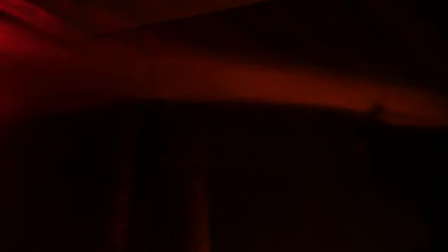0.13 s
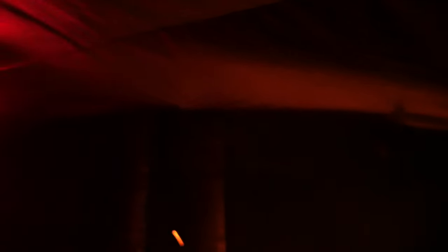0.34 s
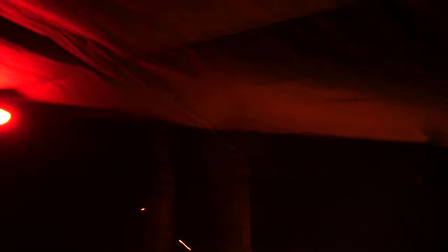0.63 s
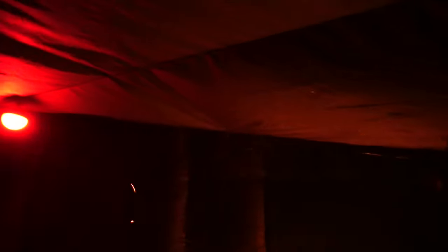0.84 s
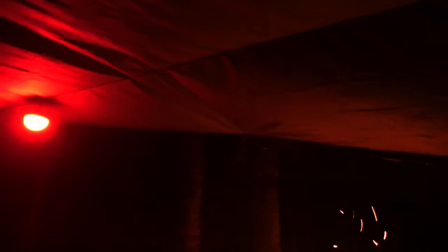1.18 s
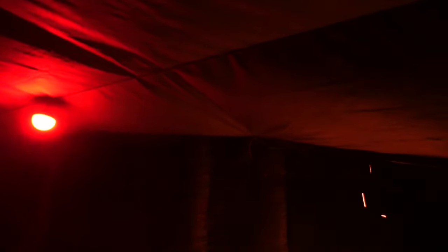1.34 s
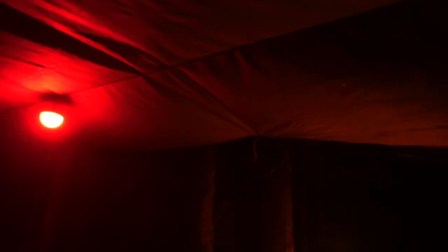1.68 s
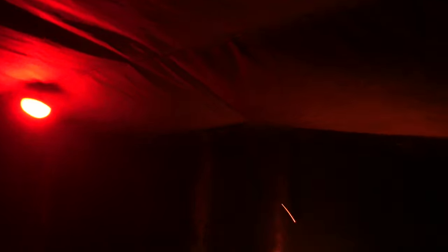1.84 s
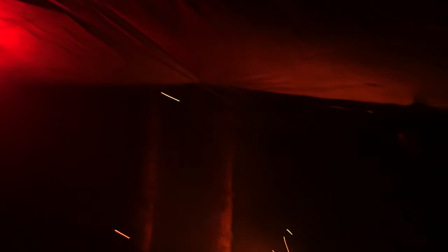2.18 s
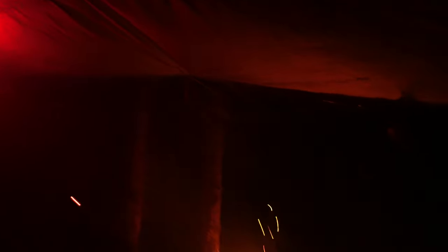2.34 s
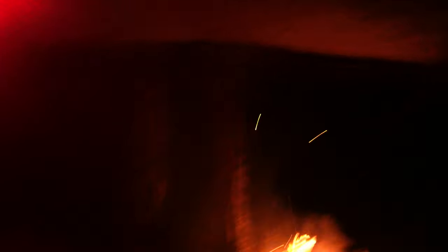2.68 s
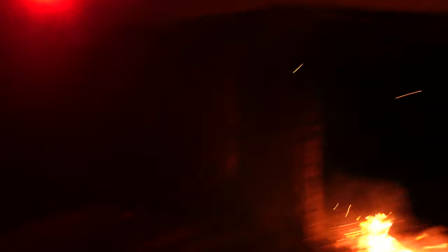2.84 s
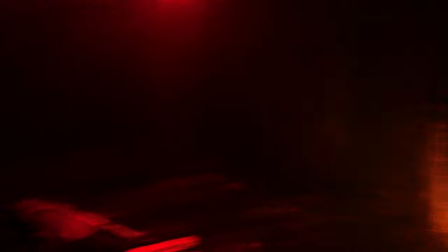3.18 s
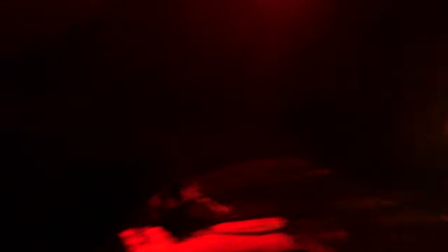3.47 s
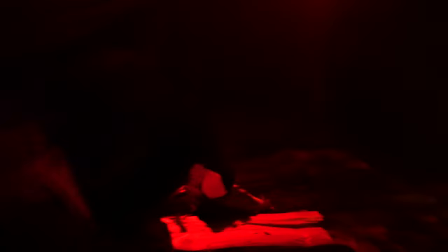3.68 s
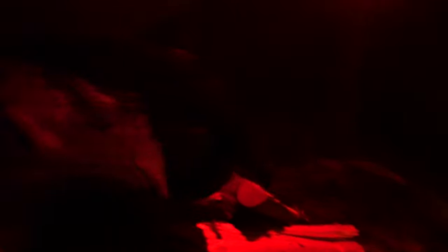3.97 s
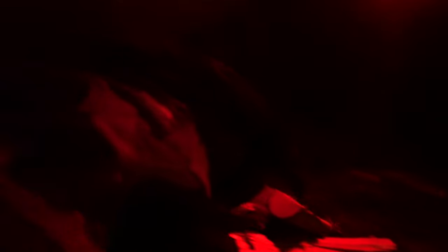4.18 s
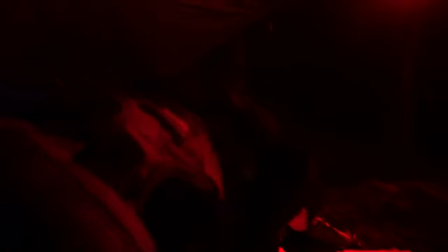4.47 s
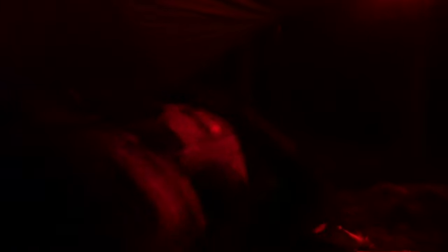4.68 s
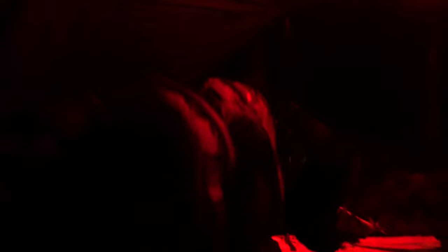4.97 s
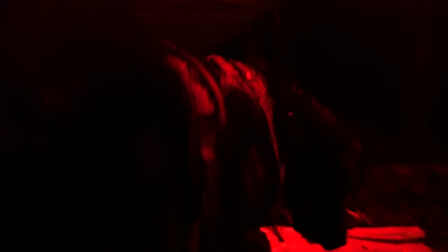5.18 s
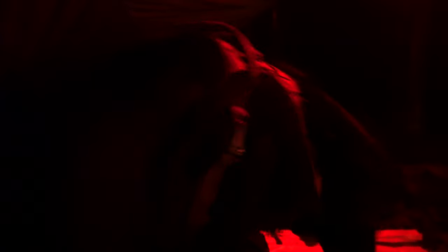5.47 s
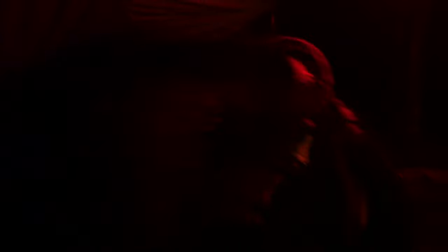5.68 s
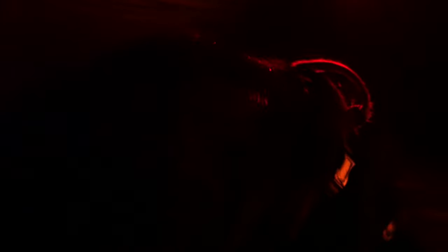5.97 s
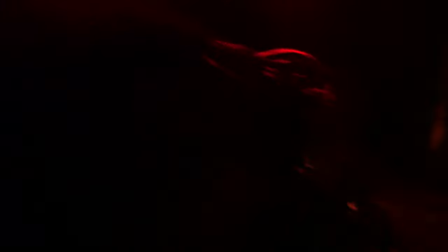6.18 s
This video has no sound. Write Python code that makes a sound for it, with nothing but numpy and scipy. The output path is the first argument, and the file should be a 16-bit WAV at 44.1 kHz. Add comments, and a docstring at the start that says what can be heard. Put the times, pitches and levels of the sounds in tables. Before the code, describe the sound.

Rain falls on a tarp stretched low over a small, close microphone in a night forest. Throughout, fine drops patter densely and bright tiny splashes sprinkle over a soft, flickering hiss of rain on leaves. Larger drops punch the sheet irregularly, short dull thwacks with a close ground echo and wet shiver; strong ones land near 0.6, 1.4, 2.3, 3.6, 4.0, 4.5 and 5.6 seconds. Big drops grow busier from about 3 to 5 seconds, while the hiss swells from 2.6. A campfire flutters very low, with rumbling surges around 2.7, 3.2 to 3.5, 4.9 and 6.2. Dull pops sound at 1.7, 2.6, 3.7, 4.1 and 5.5. Sharp high ticks on gear come at 4.9, 5.3 and 5.6; cloth brushes faintly at 5.9, and a small hollow ping rings at 6.3 as rain continues.

```python
"""Big raindrops punch a tarp stretched low over a microphone: each is a push on a springy sheet,
with a duller ground echo, a noisy shiver and a bright burst. Smaller drops patter all over it.
Splashes are a tick with a pitched burst of noise; drops on camp gear leave dying tones. Rain hisses in
the forest as flickering noise. A camp fire throbs on a wandering sine over a noisy roar, dull pops
push outward, and cloth brushes once as grainy treble noise."""
import sys
import numpy as np
from scipy import signal
from scipy.fft import rfft, irfft
from scipy.io import wavfile
from scipy.ndimage import uniform_filter1d

SR = 44100
rng = np.random.default_rng(int(sys.argv[2]) if len(sys.argv) > 2 else 0)


def unload_audio(sound):
    """Save the sound as a 16-bit wav file, at the path given as the first command line argument."""
    columns = np.transpose(np.atleast_2d(sound))
    # keep every value between -1 and 1, then stretch to whole-number steps
    steps = np.round(np.clip(columns, -1, 1) * 32767)
    wavfile.write(sys.argv[1], SR, steps.astype(np.int16))


N = 279153  # length in samples

# All levels are set ahead of the microphone's colour.
# Big drops on the sheet. Each row: start in seconds, punch level in dB, contact time in ms,
# ground echo delay in ms.
BIG_DROPS = [(0.131, -24, 0.086, 2.0), (0.1456, -26, 0.17, 3.2), (0.1569, -24, 0.17, 4.2),
             (0.286, -27, 0.13, 3.1), (0.2922, -24.5, 0.24, 2.6), (0.3743, -29.5, 0.13, 0.91),
             (0.4502, -20, 0.24, 3.05), (0.5766, -15.5, 0.17, 3.1), (0.5852, -8.5, 0.2, 0.48),
             (0.6455, -23.5, 0.071, 2.5), (0.6798, -21, 0.053, 1.2), (0.6867, -17, 0.17, 2.8),
             (0.8723, -16.5, 0.21, 0.97), (0.8793, -23, 0.13, 3.8), (0.9123, -26.5, 0.18, 1.4),
             (0.9404, -27.5, 0.18, 3.4), (0.9516, -33, 0.19, 3.0), (0.9746, -27, 0.17, 3),
             (1.0063, -24.5, 0.083, 2.3), (1.0129, -23.5, 0.18, 2), (1.0585, -26, 0.15, 2.1),
             (1.0674, -26.5, 0.21, 3.1), (1.0868, -23.5, 0.17, 2.3), (1.1371, -26, 0.22, 2.3),
             (1.2218, -25.5, 0.19, 2.5), (1.35, -24, 0.12, 2), (1.3676, -9, 0.26, 3.4),
             (1.4241, -26, 0.09, 2.4), (1.4464, -19.5, 0.18, 3), (1.6048, -31, 0.14, 3.4),
             (1.6741, -23, 0.17, 2.5), (1.7488, -18.5, 0.33, 2.67), (1.7878, -19, 0.2, 2.9),
             (1.796, -14.5, 0.16, 2.2), (1.8483, -22, 0.24, 2.45), (1.895, -22.5, 0.065, 2.2),
             (1.989, -18, 0.14, 1.5), (2.2686, -12.5, 0.16, 2.83), (2.3425, -21, 0.11, 2.5),
             (2.352, -27.5, 0.19, 4.8), (2.411, -24, 0.16, 5.5), (2.4242, -19.5, 0.19, 3.6),
             (2.5303, -17.5, 0.2, 2.8), (2.5523, -17.5, 0.22, 2.44), (2.657, -25.5, 0.21, 2.8),
             (2.7146, -26, 0.22, 3.2), (2.877, -21.5, 0.2, 2.3), (2.8993, -18, 0.22, 4.1),
             (3.0149, -14, 0.094, 3.6), (3.067, -19.5, 0.28, 3.1), (3.0893, -21, 0.17, 1.2),
             (3.1038, -28.5, 0.56, 1.5), (3.1256, -23.5, 0.19, 1.3), (3.1589, -24, 0.13, 1.8),
             (3.2837, -36, 0.077, 3.3), (3.3123, -22.5, 0.16, 3.8), (3.377, -22, 0.21, 2.7),
             (3.432, -12.5, 0.27, 2.64), (3.4427, -21, 0.18, 1.9), (3.4969, -17, 0.28, 2.5),
             (3.511, -20.5, 0.14, 2.6), (3.5167, -19.5, 0.24, 3.3), (3.5756, -12, 0.14, 2.9),
             (3.598, -16, 0.21, 3.1), (3.6142, -27, 0.49, 1.6), (3.645, -9, 0.26, 2.74),
             (3.7386, -21, 0.087, 3), (3.8322, -18, 0.2, 3.04), (3.9407, -22.5, 0.23, 2.3),
             (3.9812, -15, 0.19, 2.6), (4.0234, -10, 0.28, 2.5), (4.0414, -23, 0.077, 2.3),
             (4.1911, -24, 0.14, 2.6), (4.1931, -26.5, 0.27, 2.3), (4.2, -18, 0.12, 1.8),
             (4.221, -26, 0.2, 3.3), (4.2372, -24.5, 0.25, 5), (4.2653, -19.5, 0.097, 2.6),
             (4.2794, -28, 0.46, 2), (4.4294, -19, 0.21, 2.5), (4.4856, -22, 0.21, 3.2),
             (4.534, -7, 0.16, 2.1), (4.5963, -24.5, 0.21, 1.9), (4.6154, -25, 0.2, 2.3),
             (4.629, -15, 0.3, 2.85), (4.6402, -22.5, 0.15, 1.9), (4.6711, -19.5, 0.69, 2.0),
             (4.722, -20.5, 0.13, 2.4), (4.736, -14, 0.22, 3.07), (4.771, -24.5, 0.11, 1.9),
             (4.8427, -21.5, 0.16, 2.2), (4.8643, -23, 0.31, 2.8), (4.9015, -20, 0.1, 1.4),
             (4.947, -25.5, 0.18, 3.2), (4.967, -19.5, 0.13, 1.6), (5.0124, -17.5, 0.074, 2.1),
             (5.0403, -22.5, 0.086, 2.5), (5.07, -15, 0.29, 2.14), (5.1507, -24, 0.11, 2.6),
             (5.257, -30, 0.16, 2.8), (5.2969, -24, 0.17, 2.4), (5.3371, -21.5, 0.27, 1.2),
             (5.3695, -16, 0.14, 2.1), (5.4038, -22, 0.2, 1.5), (5.4355, -14.5, 0.24, 2.55),
             (5.4625, -19.5, 0.16, 3.1), (5.577, -23.5, 0.3, 3.4), (5.584, -6.5, 0.17, 2.28),
             (5.7321, -22.5, 0.35, 2.2), (5.7632, -20.5, 0.19, 2.1), (5.7696, -24, 0.13, 2.6),
             (5.9524, -16.5, 0.061, 1.7), (6.1026, -28, 0.13, 2.6), (6.1275, -21.5, 0.1, 2.1),
             (6.1907, -17, 0.17, 2.2), (6.2102, -29, 0.23, 2.3), (6.2352, -29.5, 0.16, 1.7),
             (6.2681, -12.5, 0.22, 2.4), (6.2963, -34, 0.22, 1.4)]
# Ground echo of the big drops, stronger and weaker by turns.
# Each row: time in seconds, echo level in dB relative to the drop.
GROUND_ECHO = [(0.0, -10), (1.4, -15.5), (1.75, -6.5), (3.1, -17.5), (3.5, -10), (4.7, -7), (6.33, -12)]
# The brightest splashes. Each row: start in seconds, level in dB, pitch in Hz.
BRIGHT_SPLASHES = [(0.1984, -33.5, 5400), (0.872, -38, 3660), (1.071, -35, 6850), (1.3928, -34, 4650),
                   (1.4213, -34, 9000), (1.5521, -37.5, 3480), (1.8365, -30.5, 7000), (2.1898, -36.5, 3730),
                   (2.2135, -38, 3670), (2.374, -41, 4180), (2.3997, -34.5, 3500), (2.497, -38, 4070),
                   (2.7542, -37, 5080), (2.8, -37, 5330), (2.9973, -41, 5100), (3.015, -32, 3800),
                   (3.4784, -35, 6000), (3.559, -44, 6000), (3.612, -41, 8000), (3.6421, -33, 4400),
                   (4.0124, -33, 4900), (4.1907, -41, 4100), (4.373, -32, 5350), (5.1492, -30.5, 5100),
                   (5.2866, -37, 5200), (5.578, -29, 4790), (5.5831, -29, 7450), (5.9908, -32, 4600)]
# Drops on hollow or hard gear. Each row: start in seconds, level in dB, pitch in Hz,
# time to fall 60 dB in seconds.
GEAR_PINGS = [(1.553, -28.5, 390, 0.021), (1.689, -44, 130, 0.054), (4.87, -30.5, 5860, 0.02),
              (4.9225, -22.5, 5650, 0.02), (5.3345, -21.5, 5730, 0.019), (5.585, -29.5, 81.5, 0.065),
              (5.6151, -31.5, 5980, 0.012), (5.6763, -31, 5900, 0.0079), (6.272, -36.5, 355, 0.19),
              (6.272, -46, 4750, 0.2), (6.271, -46, 5350, 0.11)]
# Strength of the rain. Each row: time in seconds, swell of the hiss in dB, patter on the sheet in dB.
RAIN_LEVELS = [(0.0, -50, -43), (0.33, -63, -48.5), (1.51, -63.5, -48.5), (2.61, -51.5, -47),
               (3.12, -47.5, -46), (3.52, -53, -43.5), (3.97, -51, -51), (4.37, -48, -51.5),
               (4.85, -47.5, -46.5), (5.08, -55, -47.5), (5.99, -55, -49), (6.33, -55, -45.5)]
# Throb of the flames. Each row: time in seconds, level in dB.
FLAME_LEVELS = [(0.0, -43.5), (0.3, -29.5), (0.95, -42), (2.54, -36.5), (2.8, -33.5), (3.06, -39),
                (3.22, -24), (3.31, -36), (3.45, -20), (3.57, -36), (3.77, -29.5), (3.94, -35.5),
                (4.08, -29), (4.4, -36.5), (4.59, -28.5), (4.8, -36), (4.9, -25), (5.12, -34), (5.8, -36.5),
                (6.17, -26), (6.33, -33)]
# Flare-ups of the roar. Each row: time of the peak in seconds, level there in dB.
ROAR_FLARES = [(2.72, -37.5), (3.21, -40), (4.01, -41), (4.15, -50), (4.45, -50), (4.68, -48), (5.96, -43),
               (6.32, -36)]
# Dull outward pops, probably wood in the fire. Each row: start in seconds, level in dB,
# length of the push in ms, swing-back in Hz.
FIRE_POPS = [(1.6880, -20, 0.1, 200), (1.6889, -26, 0.84, 120), (2.6101, -16.5, 0.13, 60),
             (3.6777, -21.5, 0.19, 200), (4.072, -24, 0.12, 250), (4.1243, -19, 0.24, 199),
             (4.3217, -30, 0.71, 152), (5.43, -23.5, 0.39, 60), (5.5183, -26.5, 0.17, 150)]
# Spectrum of the steady hiss. Each row: frequency in Hz, relative level in dB per Hz.
HISS_COLOUR = [(35, -34), (60, 3.5), (156, -3), (417, -14.5), (968, -11.5), (3270, -12.5), (8000, -16),
               (16000, -17)]
# Spectrum of the hiss that comes and goes. Each row: frequency in Hz, relative level in dB per Hz.
SWELL_COLOUR = [(1500, -7), (3000, -12.5), (5400, -3.5), (6500, -6.5), (9000, -10), (12000, -10.5)]
# Spectrum of the wet sheet's shiver. Each row: frequency in Hz, relative level in dB per Hz.
SHIVER_COLOUR = [(200, 5), (500, 7), (1200, 8.5), (3000, -2), (5500, -14), (9000, -8), (16000, -15)]
# Spectrum of the fire's roar. Each row: frequency in Hz, relative level in dB per Hz.
ROAR_COLOUR = [(12, 4.5), (22, -9), (35, 3.5), (55, -3.5), (80, -14.5), (140, -42)]
# Spectrum of the cloth brush. Each row: frequency in Hz, relative level in dB per Hz.
CLOTH_COLOUR = [(1500, -14), (3500, -5), (8000, -2), (16000, -6)]
# Response of the small microphone. Each row: frequency in Hz, gain in dB.
MIC_RESPONSE = [(4500, 0), (5600, -2), (6400, -3.5), (8300, -3), (9800, -8), (13000, -7), (15600, -13.5)]


def gain_of(db):
    """Turns decibels into a factor."""
    return 10 ** (np.asarray(db) / 20)


def evened(x):
    """Scales to an rms of one."""
    return x / np.sqrt(np.mean(x ** 2) + 1e-20)


def curve(rows, axis):
    """Draws one column of a table as straight lines, sample by sample."""
    rows = np.array(rows)
    return np.interp(np.arange(N) / SR, rows[:, 0], rows[:, axis])


def coloured(x, points):
    """Shapes the spectrum of x, straight between points on a log frequency axis, at an rms of one."""
    f, db = np.transpose(points)
    hz = np.fft.rfftfreq(len(x), 1 / SR)
    gain = gain_of(np.interp(np.log(hz + 1), np.log(f + 1), db))
    return evened(irfft(rfft(x) * gain, len(x)))


def add(mix, s, sound):
    """Lays a sound into the mix at time s, cut at the end of the mix."""
    part = mix[round(s * SR):][:len(sound)]
    part += sound[:len(part)]


def random_hits(per_s, spread_db, most):
    """Random drops: mostly zeros, with a gain of random size wherever one lands."""
    size = gain_of(spread_db * np.minimum(rng.exponential(1, N), most))
    return size * (rng.random(N) < per_s / SR)


def hiss(bursts_per_s=120, fade_s=0.0079):
    """Far rain on leaves and ground; it jumps up and sinks back as clusters of drops land."""
    bursts = rng.random(N) * (rng.random(N) < bursts_per_s / SR)
    flicker = signal.lfilter([1], [1, -np.exp(-1 / (fade_s * SR))], bursts)
    steady = gain_of(-52) * coloured(rng.standard_normal(N), HISS_COLOUR)
    swell_gain = gain_of(curve(RAIN_LEVELS, axis=1))
    swell = swell_gain * coloured(rng.standard_normal(N), SWELL_COLOUR)
    return evened(1 + 1.66 * flicker) * (steady + swell)


def flame_throb(mean_hz=13, wander_hz=3):
    """Flames pulse at a slowly wandering rate, with a touch of second harmonic."""
    smooth = uniform_filter1d(rng.standard_normal(N), size=2500)
    wander = evened(uniform_filter1d(smooth, size=2500))
    phase = 2 * np.pi * np.cumsum(mean_hz + wander_hz * wander) / SR
    throb = evened(np.sin(phase) + 0.11 * np.sin(2 * phase))
    return gain_of(curve(FLAME_LEVELS, axis=1)) * throb


def fire_roar(floor_db=-52, rise_db_per_s=115, fall_db_per_s=55):
    """Low turbulent noise that flares up quickly and sinks back more slowly."""
    t = np.arange(N) / SR
    roar_db = np.full(N, float(floor_db))
    for s, db in ROAR_FLARES:
        below_peak = np.maximum(rise_db_per_s * (s - t), fall_db_per_s * (t - s))
        roar_db = np.maximum(roar_db, db - below_peak)
    return gain_of(roar_db) * coloured(rng.standard_normal(N), ROAR_COLOUR)


def brush():
    """Cloth slides briefly, then trails off more softly: grainy treble noise."""
    start_s, rise_s, fade_s = 5.905, 0.0095, 0.013
    hold_s, tail_s = 0.059, 0.051
    t = np.arange(N) / SR - start_s
    rise = np.clip(t / rise_s, 0, 1)
    slide = gain_of(-38) * np.clip(1 - (t - hold_s) / fade_s, 0, 1)
    trail = gain_of(-51) * np.clip(1 - (t - hold_s - tail_s) / fade_s, 0, 1)
    grain = evened(uniform_filter1d(rng.standard_normal(N), size=90))
    cloth = coloured(rng.standard_normal(N), CLOTH_COLOUR)
    return rise * np.maximum(slide, trail) * gain_of(1.4 * grain) * cloth


def punch(contact_ms, sheet_hz=150, damping=3.07):
    """The sheet is knocked away and swings back; it cannot radiate deep bass."""
    u = np.arange(1024) / SR / (contact_ms / 1000)
    push = -(u * np.exp(1 - u)) ** 2  # strongest at the contact time
    w = 2 * np.pi * sheet_hz
    b, a = signal.bilinear([1, 0, 0], [1, damping * w, w * w], SR)
    y = signal.lfilter(b, a, push)
    return y / -y.min()


def pops():
    """Outward pushes, opposite in sign to a drop's, each with a short rattle behind it."""
    out, t = np.zeros(N), np.arange(1024) / SR
    for (s, db, ms, hz), noise in zip(FIRE_POPS, rng.standard_normal((len(FIRE_POPS), 1024))):
        rattle = coloured(noise, SHIVER_COLOUR) * gain_of(-22.0 - 60 * t / 0.049)
        add(out, s, gain_of(db) * (rattle - punch(ms, hz, damping=1.35)))
    return out


def splash(hz, noise, top_db=-14):
    """Breaking water: a sharp tick and a short bright burst around one pitch."""
    t = np.arange(len(noise)) / SR
    colour = [(hz / 4, -20), (hz / 1.25, -6), (hz, 0), (hz * 1.42, -6), (hz * 3, top_db)]
    tick = 6.17 * (t == 0)  # the first crack, against noise of rms one
    burst = coloured(noise - tick, colour)
    return burst * (gain_of(-60 * t / 0.0067) + gain_of(-22.5 - 60 * t / 0.11))


def pings():
    """Dying tones, fluttering a little as the water spreads, under the splash that starts them."""
    out, t = np.zeros(N), np.arange(4096) / SR
    for (s, db, hz, t60), noise in zip(GEAR_PINGS, rng.standard_normal((len(GEAR_PINGS), 4096))):
        flutter = 1 + 0.75 * evened(uniform_filter1d(noise, size=40))
        tone = flutter * np.sin(2 * np.pi * hz * t) * gain_of(-60 * t / t60)
        add(out, s, gain_of(db) * (gain_of(-6.0) * splash(hz, noise) - tone))
    return out


def bright_splashes():
    """The clear splashes, each water burst at its own pitch."""
    out = np.zeros(N)
    noises = rng.standard_normal((len(BRIGHT_SPLASHES), 1024))
    for (s, db, hz), noise in zip(BRIGHT_SPLASHES, noises):
        add(out, s, gain_of(db) * splash(hz, noise))
    return out


def fine_spatter(level_db=-54):
    """Small splashes at random over sixteen pitches, weaker the higher they are."""
    hits = random_hits(per_s=450, spread_db=1.5, most=3)
    patch, out = rng.integers(0, 16, N), np.zeros(N)
    for k, hz in enumerate(np.geomspace(3000, 13000, num=16)):
        burst = splash(hz, rng.standard_normal(1024)) * (3000 / hz) ** 0.38
        out += signal.oaconvolve(hits * (patch == k), burst)[:N]
    return gain_of(level_db) * evened(out)


def drop(contact_ms, echo_ms, echo_db, noise):
    """A punch, its duller echo off the ground, and the wet sheet shivering after it."""
    t = np.arange(1024) / SR
    y = punch(contact_ms)
    add(y, echo_ms / 1000, gain_of(echo_db) * punch(1.6 * contact_ms))  # longer contact is duller
    shiver = gain_of(-19.5 - 60 * t / 0.035) + gain_of(-33.5 - 60 * t / 0.041)
    onset = np.minimum(t / 0.00027, 1)
    return y + coloured(noise, SHIVER_COLOUR) * shiver * onset


def patter(patches=24):
    """Small drops at random, each falling on one of many patches of the sheet and bursting there."""
    hits = random_hits(per_s=300, spread_db=4.0, most=2.6)
    patch, out = rng.integers(0, patches, N), np.zeros(N)
    for k, (a, b, c, d) in enumerate(rng.random((patches, 4))):
        contact_ms, echo_ms, echo_db = 0.045 * 3.9 ** a, 1.483 + 2.437 * b, -14 + 9 * c
        burst_hz, burst_db = 3500 + 6000 * b, -16 + 10 * d
        tap = drop(contact_ms, echo_ms, echo_db, rng.standard_normal(1024))
        tap = tap + gain_of(burst_db) * splash(burst_hz, rng.standard_normal(1024))
        out += signal.oaconvolve(hits * (patch == k), tap)[:N]
    return gain_of(curve(RAIN_LEVELS, axis=2)) * evened(out)


def big_drops():
    """Every drop that stands out: it punches the sheet and bursts as the sheet gives way."""
    middling_db, middling_burst_db, growth = -18, -36, 0.72  # growth of the burst in dB per dB
    burst_hz, burst_lead_s = 4400, 0.00021
    out = np.zeros(N)
    echo_db = curve(GROUND_ECHO, axis=1)
    noises = rng.standard_normal((len(BIG_DROPS), 2, 1024))
    for (s, db, ms, echo_ms), (shiver_noise, burst_noise) in zip(BIG_DROPS, noises):
        add(out, s, gain_of(db) * drop(ms, echo_ms, echo_db[round(s * SR)], shiver_noise))
        burst_db = middling_burst_db + growth * (db - middling_db)
        burst = splash(burst_hz, burst_noise, top_db=-21)  # dull on top, heard through the sheet
        add(out, s - burst_lead_s, gain_of(burst_db) * burst)
    return out


def scene():
    """Sums all sources at the microphone, as one channel."""
    background = hiss() + flame_throb() + fire_roar() + brush() + pops()
    water = pings() + bright_splashes() + fine_spatter() + patter()
    return (background + water + big_drops())[None]


def record(dry):
    """The colour of the small microphone, then the band limit of the recorder."""
    f, db = np.transpose(MIC_RESPONSE)
    hz = np.linspace(0, SR / 2, num=257)
    doubled_db = 2 * np.interp(hz, f, db)  # the minimum-phase step halves the decibels
    colour = signal.minimum_phase(signal.firwin2(511, hz, gain_of(doubled_db), fs=SR))
    heard = signal.lfilter(colour, 1, dry)
    edge_hz = 15650
    band_limit = signal.firwin(511, edge_hz, window=("kaiser", 9), fs=SR)
    return signal.oaconvolve(heard, band_limit[None], "same")


dry = scene()
out = record(dry)
unload_audio(out)
```